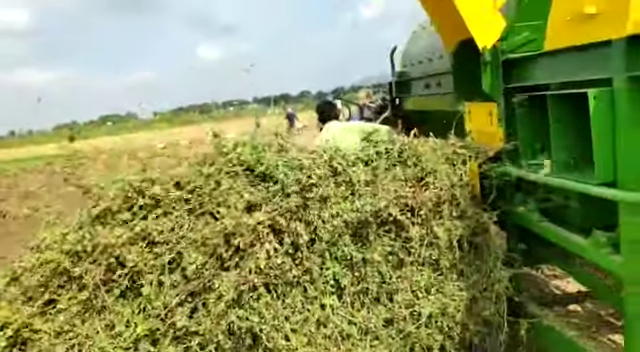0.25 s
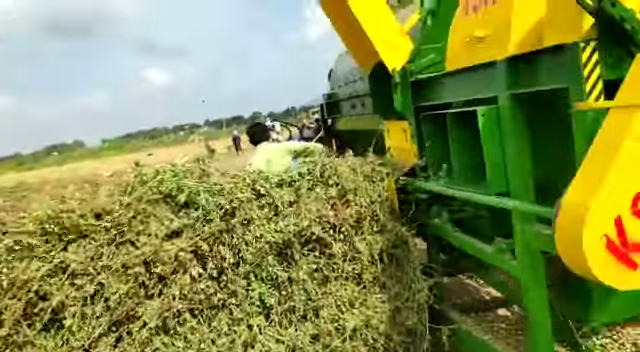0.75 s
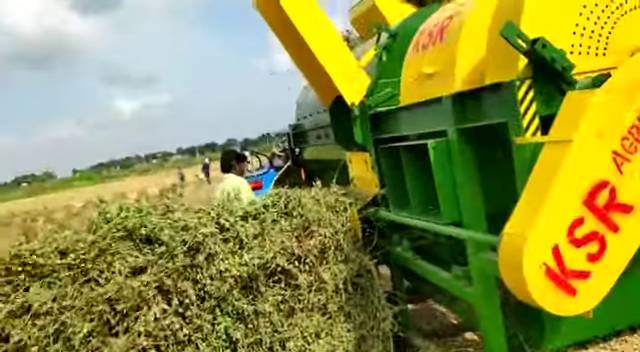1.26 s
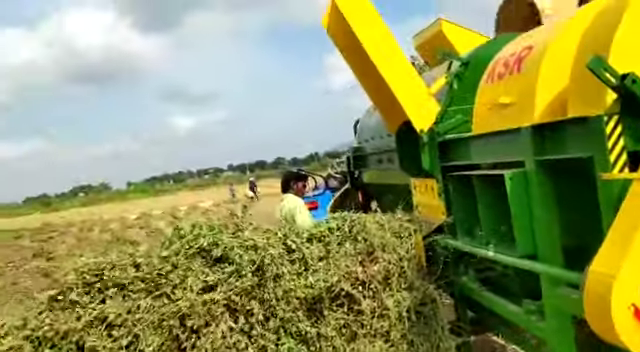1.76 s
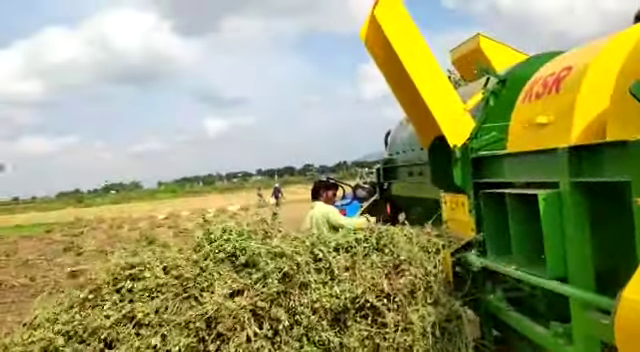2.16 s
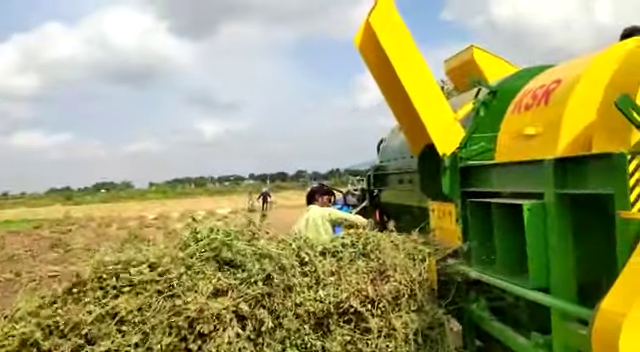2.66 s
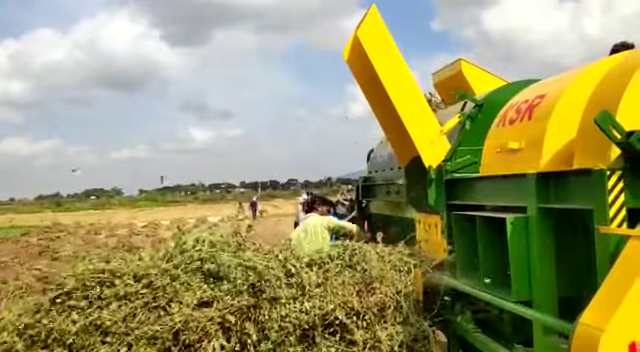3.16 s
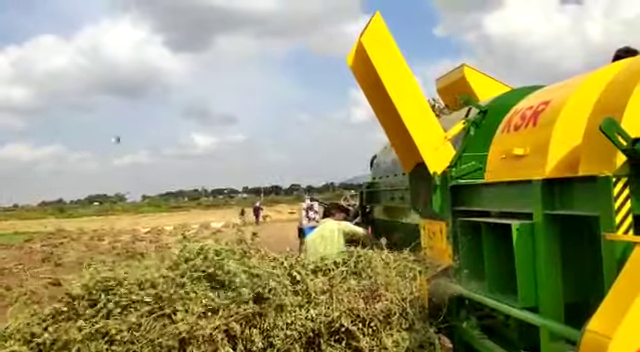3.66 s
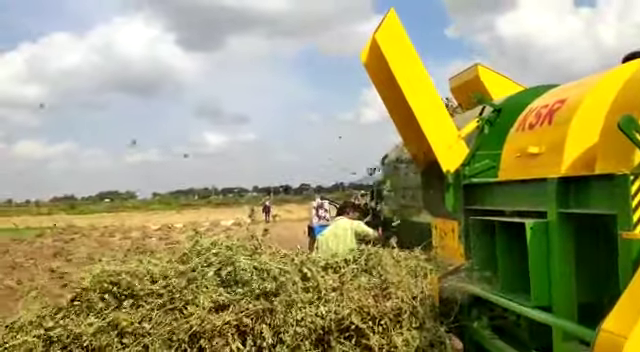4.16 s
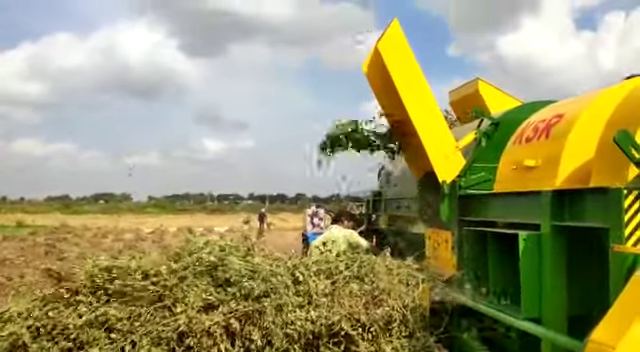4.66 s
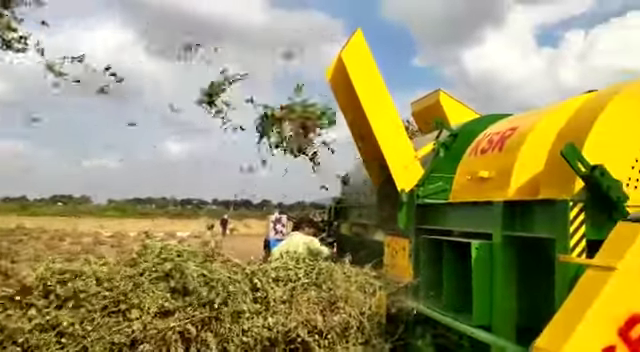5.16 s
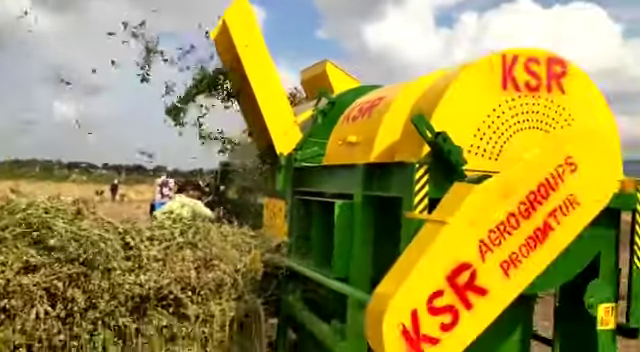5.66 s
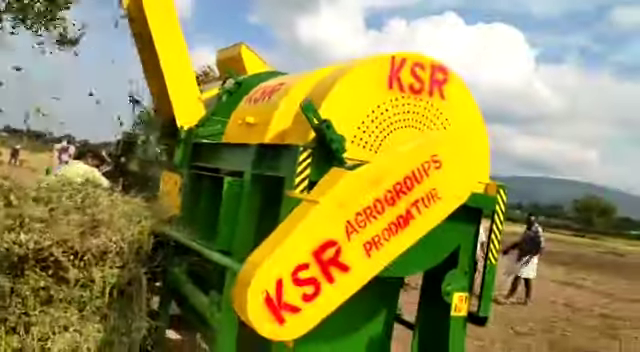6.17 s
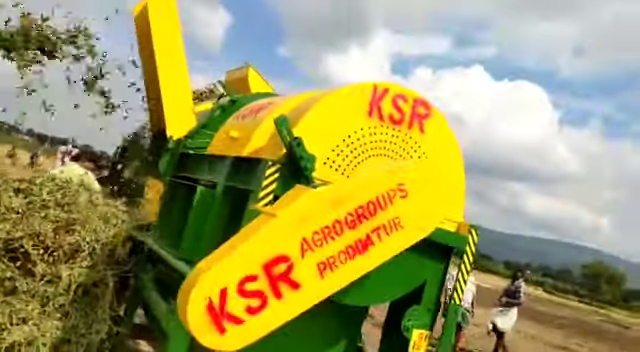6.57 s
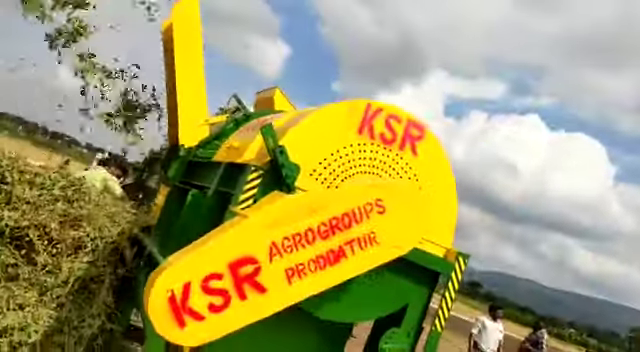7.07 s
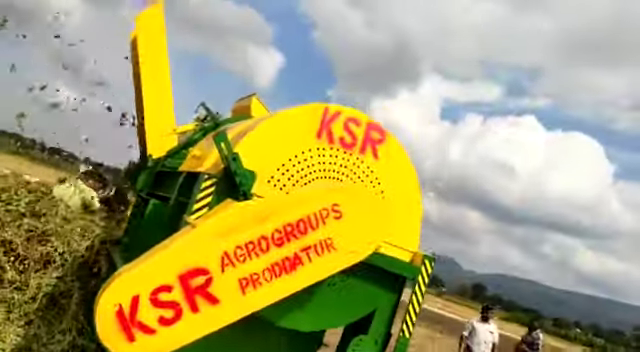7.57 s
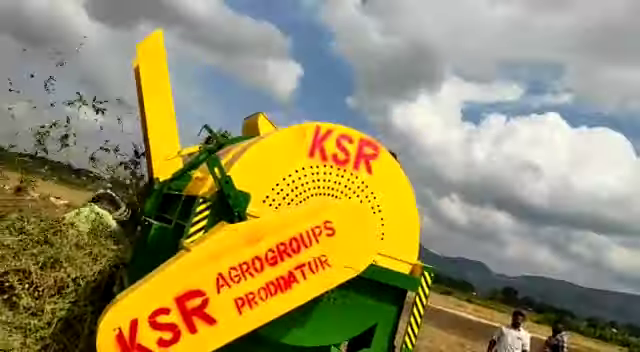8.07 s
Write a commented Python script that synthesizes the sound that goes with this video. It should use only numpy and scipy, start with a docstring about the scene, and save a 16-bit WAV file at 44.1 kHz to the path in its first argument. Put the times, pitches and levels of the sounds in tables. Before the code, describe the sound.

From 0 to about 8.3 seconds a crop thresher runs without stopping, close to a handheld stereo microphone in an open field. Its blower makes a deep, buzzing throb of about fifty beats a second, dipping slightly in pitch around 2 to 3 seconds and recovering, over broad low rumble. Beaten vines give a grainy midrange roar, dry chaff and fine dust a dense bright hiss, and loose sheet metal a constant light clatter. Short clump bursts come at 0.8 to 0.9 seconds; the load then swells to its fullest near 1.4 and eases. Dry stalks snap irregularly throughout, left or right, with strong cracks near 4.3 and 8.15. More brief throaty clumps pass at 2.6, 4.7, 5.7 and 8.2. Between 5.4 and 6 seconds the microphone turns, shifting the stereo image and tone; the threshing thins slightly towards the end, cutting off while still running.

```python
"""In an open field a crop thresher runs steadily, heard from close by on a hand-held two-port microphone.
Blower blades throb about fifty times a second, as a harmonic series over a low rumble of air and frame.
The drum beats the vines and chaff hisses, as filtered noise; knocks ring sheet-metal modes; stalks snap
and clumps drag through, as short noise bursts. The microphone turns slowly, which glides the delay
between its ports, and its limiter ducks the loudest peaks."""
import sys
import numpy as np
from scipy import signal
from scipy.fft import rfft, irfft, next_fast_len
from scipy.io import wavfile
from scipy.ndimage import map_coordinates

SR = 44100
rng = np.random.default_rng(int(sys.argv[2]) if len(sys.argv) > 2 else 0)


def generate_wav(sig):
    """Save sig (samples, or channels by samples) to the path in sys.argv[1] as 16-bit PCM at SR."""
    pcm = np.round(np.clip(np.atleast_2d(sig).T, -1, 1) * 32767).astype(np.int16)
    wavfile.write(sys.argv[1], SR, pcm)


N = 367353
FFT_SIZE = next_fast_len(N)


def from_db(db):
    """Level to amplitude: 20 dB is a factor of ten."""
    return 10 ** (np.asarray(db) / 20)


def rms_one(x):
    """Normalisation: equal mean power, rms 1."""
    return x / np.sqrt(np.mean(x ** 2) + 1e-20)


def in_time(rows):
    """Linear interpolation in time: each column at every sample."""
    times, *columns = np.transpose(rows)
    return [np.interp(np.arange(N) / SR, times, column) for column in columns]


def on_grid(points):
    """Interpolation over log frequency: each spectrum column at every FFT bin."""
    hz, *columns = np.transpose(points)
    log_bins = np.log(np.arange(FFT_SIZE // 2 + 1) * SR / FFT_SIZE + 1)
    return np.array([np.interp(log_bins, np.log(hz), column) for column in columns])


def shaped(x, gain):
    """Zero-phase filtering: each FFT bin is multiplied by a real gain."""
    return irfft(rfft(x, FFT_SIZE) * gain, FFT_SIZE)[..., :N]


def drift(rate_hz):
    """Low-passed random fluctuation: white noise through a double pole, rms 1."""
    step = 40   # samples between control points
    r = np.exp(-2 * np.pi * step * rate_hz / SR)
    noise = rng.standard_normal(N // step + 2002)
    slow = signal.lfilter([1], [1, -2 * r, r * r], noise)[2000:]   # settled part only
    return np.interp(np.arange(N) / step, np.arange(len(slow)), rms_one(slow))


def delayed(x, delay_us):
    """Varying propagation delay: the signal is read late, between samples."""
    return map_coordinates(x, [np.arange(N) - delay_us * SR / 1e6], order=3, mode="nearest")


def band_noise(hz, octaves, size):
    """Band-limited noise: three independent rows of one band, rms 1 overall."""
    edges = hz * 2 ** (np.clip(octaves, .1, 3) * np.array([-.5, .5]))
    edges = np.clip(edges, 100, .45 * SR)
    band = signal.butter(2, edges, "band", fs=SR, output="sos")
    return rms_one(signal.sosfilt(band, rng.standard_normal((3, size))))


# power share of noise common to both ports: (frequency [Hz], share [0 to 1])
LIKENESS = [(40, 0.96), (160, 1), (450, 0.94), (800, 0.81), (1500, 0.68), (3000, 0.14), (8000, 0.13),
            (15000, 0.059)]


def spread(envelope, spectrum):
    """Partial coherence: noise as rows common, left's own and right's own; rms about the envelope."""
    share = np.clip(on_grid(LIKENESS)[0], 0, 1)
    gain = from_db(on_grid(spectrum)) * np.sqrt([share, 1 - share, 1 - share])
    bins = rng.standard_normal(gain.shape) + 1j * rng.standard_normal(gain.shape)
    rows = irfft(gain * bins, FFT_SIZE)[:, :N]
    return envelope * rows / np.std(rows[0] + rows[1])


# throb of the blower, before its overtones and drift: (time [s], level [dB])
BLOWER_LEVEL = [(0, -12), (1.5, -10.5), (1.9, -13), (2.7, -12.5), (3.2, -12.5), (4, -12.5), (6, -12.5),
                (7.2, -12), (8.33, -12.5)]
# blade passing rate: (time [s], passes per second [1/s])
BLADE_RATE = [(0, 50.6), (1.1, 50.7), (1.5, 50.2), (1.9, 49.4), (2.3, 49.1), (2.7, 49.1), (3.2, 49.4),
              (5, 49.7), (6.6, 50), (8.33, 50.4)]
# overtones of the throb, which change with the place of the listener, relative to the fundamental:
# (multiple [1], level at start [dB], level midway [dB], level at end [dB])
OVERTONES = [(2, -10.5, -10.5, -7), (3, -14, -14.5, -17), (4, -20, -15, -19), (5, -17, -17, -18.5),
             (6, -24.5, -21, -16), (7, -33.5, -51, -27)]
# radians: overtones trail the trough by PUFF_LAG; each above the fifth is advanced by a further step
PUFF_LAG, HIGH_ADVANCE = .8, 2.3


def blower():
    """Blade-passing tone: a phase-locked harmonic series with slight jitter in phase and level."""
    (passes_per_s,), (throb_db,) = in_time(BLADE_RATE), in_time(BLOWER_LEVEL)
    phase = 2 * np.pi * np.cumsum(passes_per_s) / SR + 0.061 * drift(7.8)
    progress = np.arange(N) / N
    wave = np.cos(phase)
    for multiple, *levels_db in OVERTONES:
        k = round(multiple)
        # k * pi lines up crests at the trough of the fundamental: overtones 2 to 5 form a puff per pass
        offset = k * np.pi - PUFF_LAG + HIGH_ADVANCE * max(k - 5, 0)
        level_db = np.interp(progress, [0, .5, 1], levels_db) + 1.44 * drift(18.6)
        wave = wave + from_db(level_db) * np.cos(k * phase + offset + 0.07 * k * drift(9.3))
    return np.sqrt(2) * from_db(throb_db + .2 * drift(2.8)) * wave


# relative spectrum of the rumble: (frequency [Hz], density [dB per Hz])
RUMBLE_SPECTRUM = [(12, -6), (28, -12), (40, -4), (62, -7), (70, -12), (78, 4), (88, -20.5), (140, -17.5),
                   (215, -10.5), (280, -14), (360, -19), (490, -14), (640, -21.5), (900, -20.5),
                   (1150, -24), (2000, -36.5)]


def rumble():
    """Broadband noise of air and frame: a fixed spectrum whose level wanders about -26 dB."""
    return spread(from_db(-26 + 1.27 * drift(2.8)), RUMBLE_SPECTRUM)


# steady load before the clumps: (time [s], drum beating [dB], chaff hiss [dB], fine dust hiss [dB])
FEED = [(0, -33, -32.5, -27), (.62, -31.5, -28.5, -28), (.92, -26.5, -28.5, -25.5),
        (1.35, -22, -22.5, -23.5), (2.5, -26, -29.5, -26.5), (3.3, -27, -30, -27), (3.9, -28.5, -30.5, -28),
        (4.6, -28, -30, -26), (5.05, -29.5, -30.5, -28), (5.3, -29.5, -30, -26), (5.6, -31.5, -31, -27),
        (5.85, -30, -30, -26), (6.55, -31.5, -30.5, -25), (7.45, -33.5, -32.5, -28),
        (7.9, -33, -31.5, -28.5), (8.33, -33.5, -33, -31.5)]
DRUM_SHARE, DUST_SHARE = .45, 0.32   # part of each clump's extra chaff, in dB, that drum and dust follow


def load():
    """Load-dependent level: drum, chaff and dust in dB swell as each clump goes through."""
    beating_db, chaff_db, dust_db = in_time(FEED)
    t = np.arange(N) / SR
    extra_db = sum(db * np.exp(-(2 * (t - middle) / length) ** 2) for middle, _, length, _, db in CLUMPS)
    return beating_db + DRUM_SHARE * extra_db, chaff_db + extra_db, dust_db + DUST_SHARE * extra_db


# modes of the sheet metal, levels relative to each other: (frequency [Hz], width [Hz], level [dB])
PANELS = [(350, 28, -2), (417, 28, -4.5), (489, 31, -3.2), (598, 28, 2), (716, 47, -2.5), (830, 31, 0),
          (927, 30, 2.5), (1200, 23, -5), (1480, 44, -9), (1654, 33, -8), (1970, 69, 0), (2415, 48, -3)]


def panels(beating_db):
    """Modal resonance: stray knocks ring each mode, which reaches the two ports at its own delay."""
    out = np.zeros((2, N))
    for hz, width_hz, level_db in PANELS:
        hits = rng.random(N) < 60 / SR   # about 60 knocks per second
        knocks = hits * rng.standard_normal(N) * from_db(1.7 * drift(4.2))
        r = np.exp(-np.pi * np.clip(width_hz, 8, 80) / SR)
        poles = [1, -2 * r * np.cos(2 * np.pi * hz / SR), r * r]
        ring = rms_one(signal.lfilter([1, 0, -1], poles, knocks + 1e-18))
        left_lag = rng.integers(0, 14)   # samples, against 7 on the right
        out += from_db(level_db) * np.array([np.roll(ring, left_lag), np.roll(ring, 7)])
    return from_db(beating_db - 8.5) * rms_one(out)


def rattle(per_s, spread_db, t60, base):
    """Shot noise: power envelope of random hits, each dying 60 dB in t60 s, over a steady base; mean 1."""
    sizes = from_db(spread_db * np.minimum(rng.exponential(1, N), 4))
    hits = (rng.random(N) < per_s / SR) * sizes
    decay = from_db(-120 / (t60 * SR))   # power, so 60 dB is six decades
    bursts = signal.lfilter([1], [1, -decay], hits + 1e-18)
    return (base + bursts / bursts.mean()) / (base + 1)


# relative spectra of the drum, the chaff and the fine dust: (frequency [Hz], density [dB per Hz])
BEATING_SPECTRUM = [(400, -7.5), (700, -5), (1000, -6), (1500, -2.5), (2200, -5), (3500, -9.5), (6000, -22),
                    (9000, -59)]
CHAFF_SPECTRUM = [(1800, -47), (3000, -8.5), (4500, -4), (7000, -1.5), (9500, -4.5), (12000, -23),
                  (16000, -20)]
DUST_SPECTRUM = [(7000, -18), (9500, 3.5), (11500, 6), (13500, 6.5), (15500, 3), (17000, -12)]


def patter():
    """Shot noise of small bits: dense, widely spread hits."""
    return rattle(250, 11.0, t60=0.12, base=4.2)


def threshing(beating_db, chaff_db, dust_db):
    """Amplitude-modulated noise: drum, chaff and dust share handfuls; each also patters on its own."""
    handfuls = rattle(40, 1.6, t60=0.4, base=2.13)
    beats = rattle(60, 10.4, t60=0.17, base=5.9)
    beating = spread(from_db(beating_db) * handfuls ** 0.34 * beats ** 0.4, BEATING_SPECTRUM)
    chaff = spread(from_db(chaff_db) * handfuls ** 0.94 * patter() ** 0.55, CHAFF_SPECTRUM)
    dust = spread(from_db(dust_db) * handfuls ** 0.52 * patter() ** 0.9, DUST_SPECTRUM)
    return beating + chaff + dust + snaps() + clumps()


# stalk snaps, level before the crack and decay, balance of the ports' own parts only:
# (time [s], level [dB], band centre [Hz], left minus right [dB])
SNAPS = [(0.1, -26, 5200, 0), (0.273, -26, 7500, 0), (0.416, -29, 12700, 1.5), (0.8031, -34, 6960, -4),
         (1.1189, -28.5, 10500, -3), (1.2935, -21, 8240, -9), (1.413, -24, 7760, -5),
         (1.5873, -26, 9780, 5), (2.232, -20.5, 9860, 7), (2.581, -24, 5110, -0.5), (2.671, -26, 12600, 9),
         (3.5738, -27.5, 8380, 2.2), (3.6616, -21.5, 7960, 3), (4.2881, -17.5, 10800, 4),
         (4.5392, -26.5, 8380, 5), (4.57, -23.5, 7800, -3), (4.667, -26, 5500, -2),
         (4.9496, -21.5, 12100, -1), (5.514, -25, 8980, 2.5), (6.0874, -23.5, 11100, 2),
         (7.121, -24.5, 8200, -5), (7.195, -32, 7400, 1.2), (7.4588, -20.5, 9300, 2),
         (7.7286, -27.5, 6270, 8), (7.9081, -19.5, 9500, 2), (8.1526, -16, 7250, 6)]
SNAP_OCTAVES, SNAP_T60_S = 1.28, 0.096
CRACK_DB, CRACK_S = 4, 0.0018   # extra level at the onset and its time constant


def snaps():
    """Impulsive fracture: a sharp crack, then a band of noise that decays exponentially, left or right."""
    out, age = np.zeros((3, N + SR)), np.arange(SR // 6) / SR
    shape_db = CRACK_DB * np.exp(-age / CRACK_S) - 60 * age / SNAP_T60_S
    for start, level_db, hz, pan_db in SNAPS:
        sides_db = pan_db * np.array([[0], [.5], [-.5]])
        burst = band_noise(hz, SNAP_OCTAVES, size=len(age))
        out[:, round(start * SR):][:, :len(age)] += from_db(level_db + shape_db + sides_db) * burst
    return out[:, :N]


# thick clumps dragged through the drum:
# (middle [s], peak level [dB], length [s], band centre [Hz], extra chaff thrown [dB])
CLUMPS = [(0.817, -34, 0.02, 1800, 11), (0.899, -28, 0.033, 1500, 6.5), (2.607, -25, 0.067, 2360, 7.5),
          (4.677, -27.5, .025, 4000, 7), (4.717, -24, 0.062, 2010, 6), (5.667, -23.5, 0.062, 1680, 8),
          (5.721, -31, 0.079, 1490, 2), (8.176, -24.5, 0.047, 1716, 7)]


def clumps():
    """Gaussian-enveloped noise: each clump swells and fades in a throaty band of the drum."""
    out, age = np.zeros((3, N + SR)), np.arange(-SR // 8, SR // 8) / SR
    for middle, level_db, length, hz, _ in CLUMPS:
        swell = from_db(level_db) * np.exp(-(2 * age / length) ** 2) * [[1], [.6], [.6]]
        first = round(middle * SR) - SR // 8
        out[:, first:][:, :len(age)] += swell * band_noise(hz, 1.3, size=len(age))
    return out[:, :N]


# microphone turning: (time [s], left lag behind right [us], grip [0 first, 1 middle, 2 last])
TURN = [(0, -190, 0), (.6, -150, .1), (.75, -130, .8), (1.1, -70, 1.1), (2, -150, .95), (5.4, -160, 1.1),
        (6, 130, 1.92), (8.33, 130, 2)]
LEFT_RISE_DB = 1.3   # the common part moves to the left port from the middle to the last grip


def at_ports(rows):
    """Interaural-style cues: the common part gets a time and level difference between the ports."""
    common, left, right = rows
    lag_us, grip = in_time(TURN)
    lean = from_db(.5 * LEFT_RISE_DB * np.clip(grip - 1, 0, 1))
    return np.array([lean * delayed(common, lag_us) + left, common / lean + right])


def scene():
    """Superposition of blower, rumble and threshing at the ports, plus the ringing panels."""
    levels_db = load()
    throb = blower() * [[1], [0], [0]]   # wholly common to both ports
    return panels(levels_db[0]) + at_ports(throb + rumble() + threshing(*levels_db))


def moving_dip(x, hz, width_hz, share):
    """Notch by subtraction: takes a share of a gliding resonance out, block by block."""
    r, out, state = np.exp(-np.pi * width_hz / SR), x.copy(), np.zeros(2)
    zeros = (1 - r * r) / 2 * np.array([1, 0, -1])
    for i in range(0, N, 512):
        poles = [1, -(1 + r * r) * np.cos(2 * np.pi * hz[i] / SR), r * r]
        band, state = signal.lfilter(zeros, poles, x[i:i + 512], zi=state)
        out[i:i + 512] -= min(share, .95) * band
    return out


def limited(wet):
    """Peak limiting: the louder port sets one gain for both, with smoothed attack and steady release."""
    threshold_db, release_db_s, attack_s, ceiling = -3, 68, 0.0013, 1.3
    over_db = np.maximum(20 * np.log10(np.abs(wet).max(axis=0) + 1e-9) - threshold_db, 0)
    ramp_db = release_db_s * np.arange(N) / SR
    held_db = np.maximum.accumulate(over_db + ramp_db) - ramp_db   # falls no faster than the release
    r = np.exp(-1 / (attack_s * SR))
    wet = wet * from_db(-signal.lfilter([1 - r], [1, -r], held_db))
    return ceiling * np.tanh(wet / ceiling)   # what slips past the attack is rounded off


# colour of the ports: (frequency [Hz], left [dB], right [dB])
PORTS = [(60, -1.17, 0.8), (450, -0.86, 1.5), (900, 0.15, 1.3), (1400, 1, -1), (1940, 2, -0.5),
         (2900, 0.6, 0.7), (3940, 1.5, 3.5), (5630, 0, 1.1), (6420, -1.5, 2.5), (8160, 5, 7), (8900, 5, 3),
         (10300, 5, -2.5), (12600, 5.5, -8), (14000, 7.5, -12), (15700, 9, -20)]
# dips from the hand over the left port: (width [Hz], share taken out [0 to 1])
HAND_DIPS = [(1770, 0.61), (1600, 0.49), (2600, 0.63), (2400, 0.7)]
# their centres before drift, one row per dip: (first grip [Hz], middle grip [Hz], last grip [Hz])
DIP_CENTRES = [(4400, 4000, 3400), (8800, 8350, 7850), (16800, 13250, 10000), (19000, 19000, 13600)]


def record(dry):
    """Transducer response: port colour, hand dips at the left port, limiter, steep low-pass."""
    wet = shaped(dry, from_db(on_grid(PORTS)))
    grip = in_time(TURN)[1]
    for centres, (width_hz, share) in zip(DIP_CENTRES, HAND_DIPS):
        hz = np.interp(grip, [0, 1, 2], centres) * (1 + 0.0092 * drift(3))
        wet[0] = moving_dip(wet[0], np.minimum(hz, .45 * SR), width_hz, share)
    low_pass = signal.ellip(14, .2, 70, 15850, fs=SR, output="sos")   # ripple dB, stop dB, edge Hz
    return signal.sosfilt(low_pass, limited(wet))


dry = scene()
out = record(dry)
generate_wav(out)
```